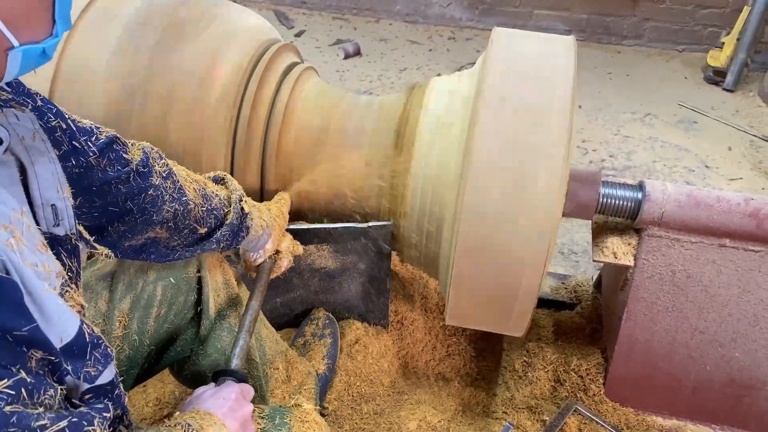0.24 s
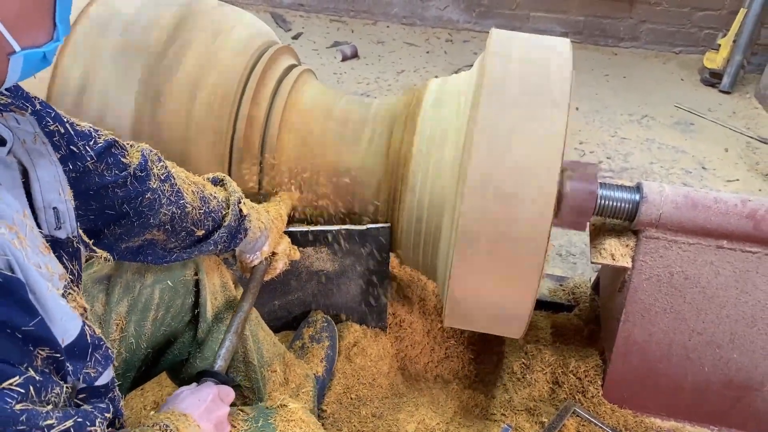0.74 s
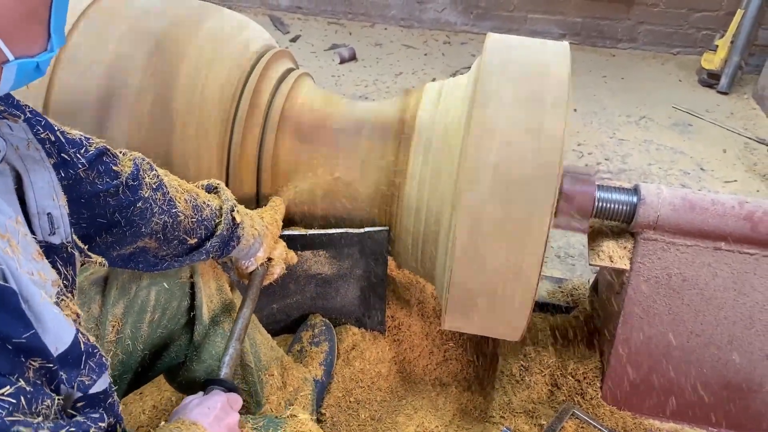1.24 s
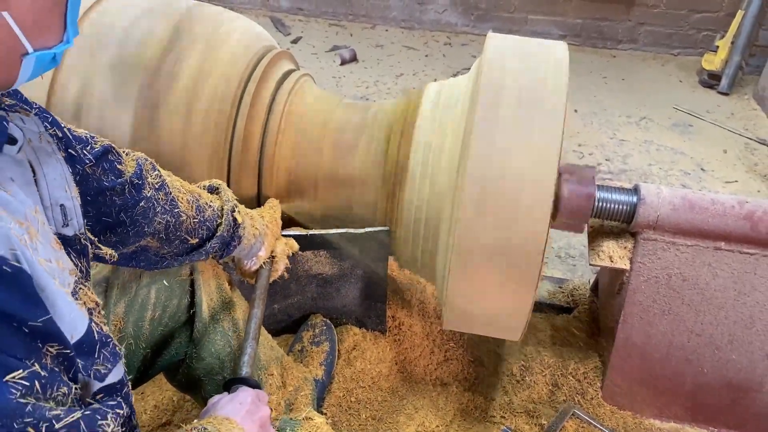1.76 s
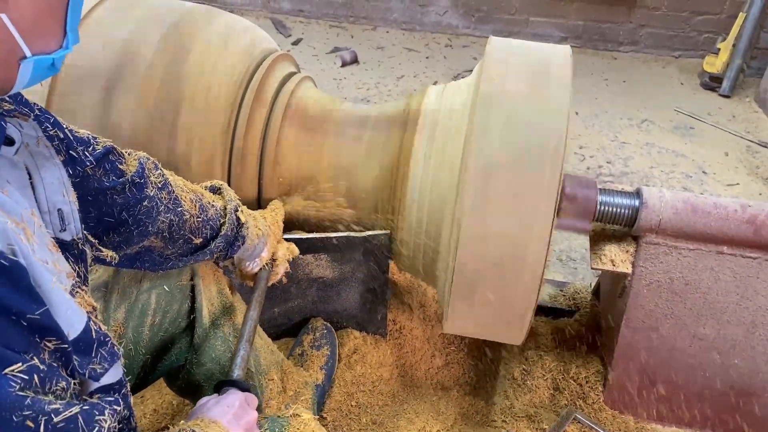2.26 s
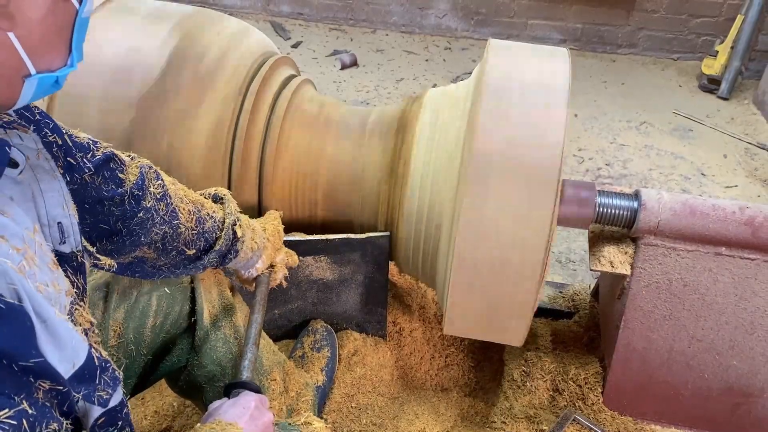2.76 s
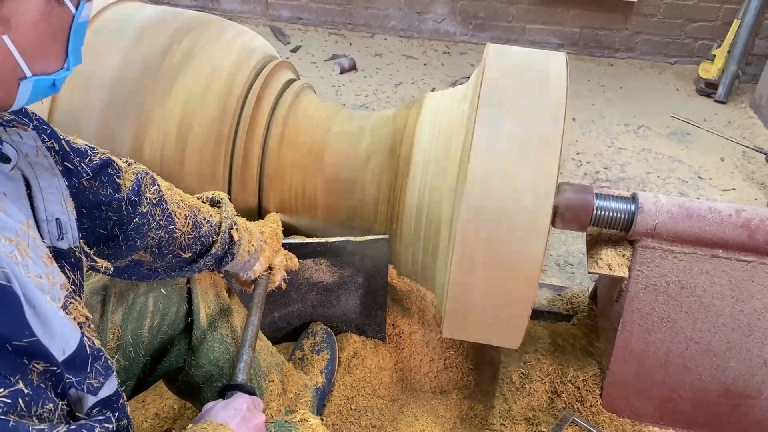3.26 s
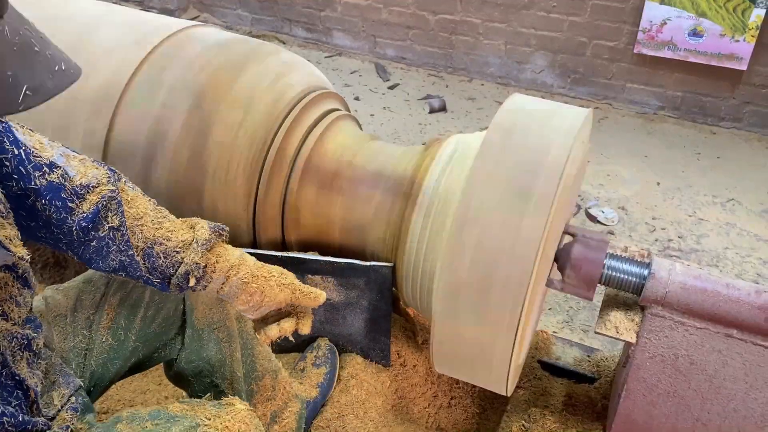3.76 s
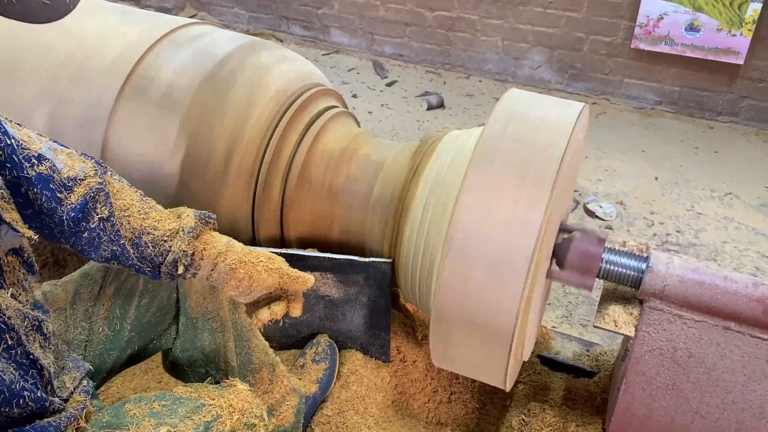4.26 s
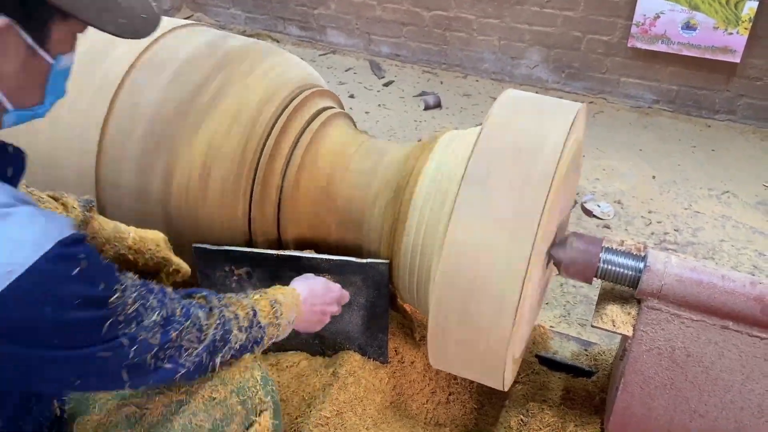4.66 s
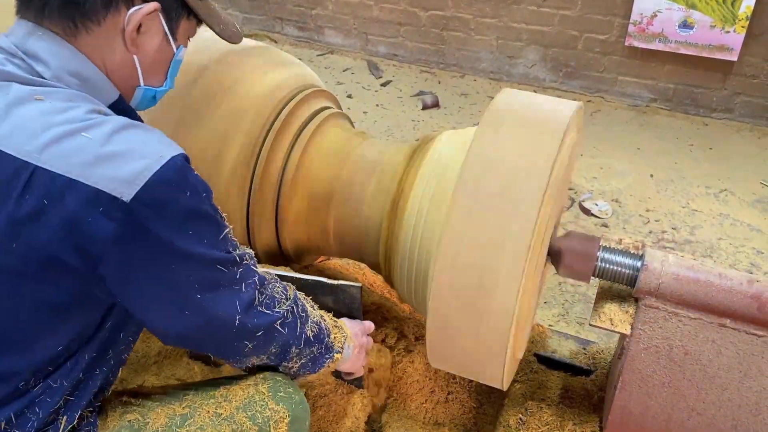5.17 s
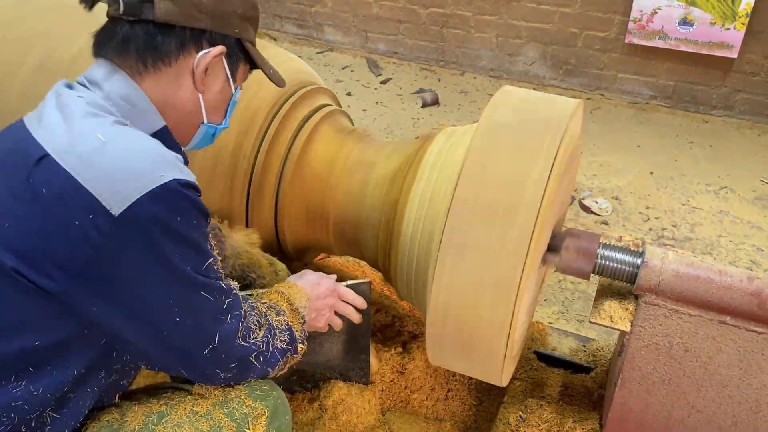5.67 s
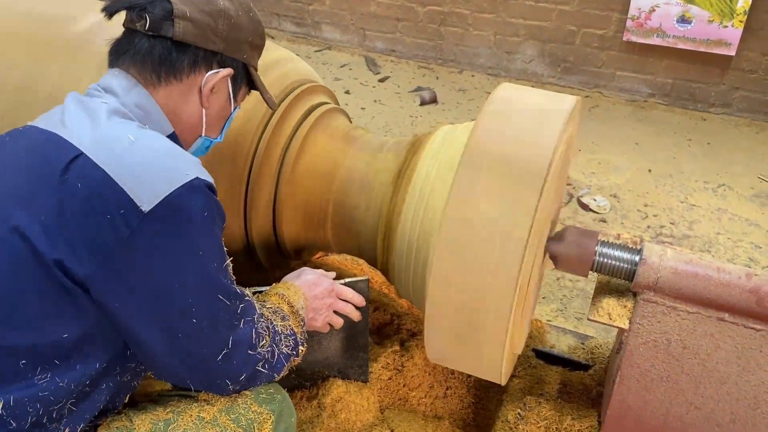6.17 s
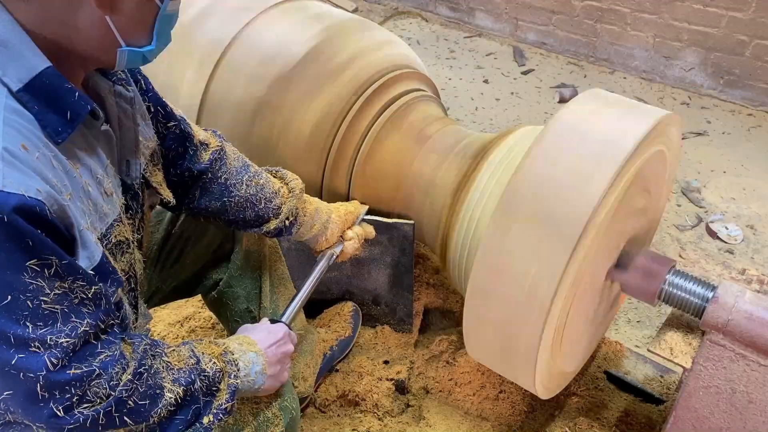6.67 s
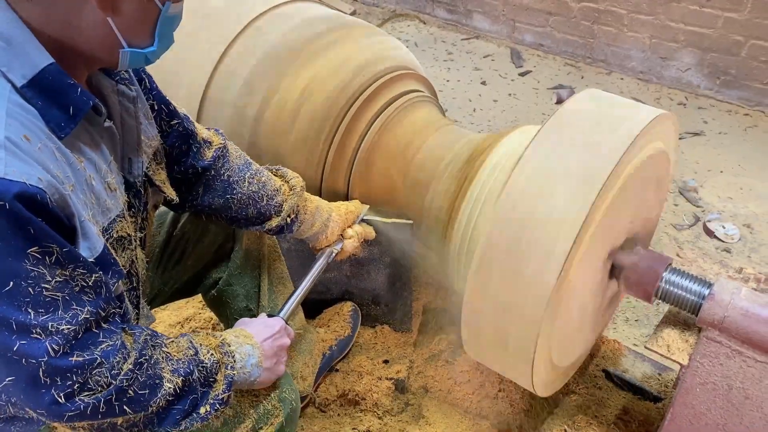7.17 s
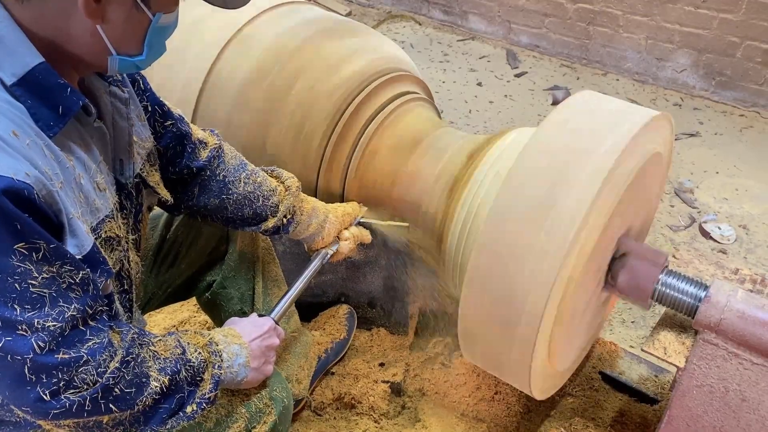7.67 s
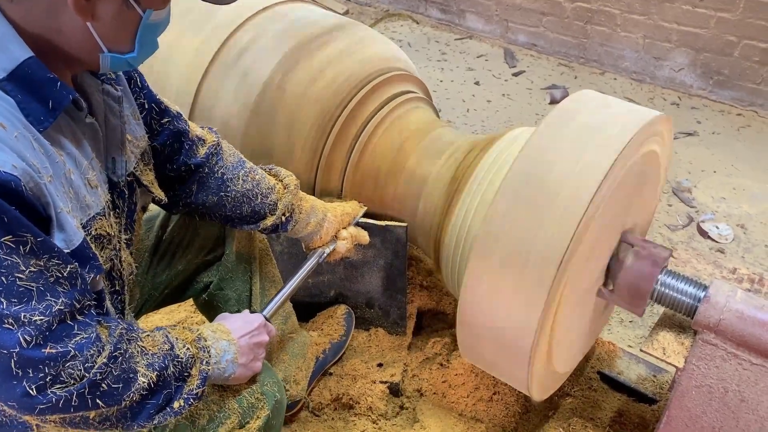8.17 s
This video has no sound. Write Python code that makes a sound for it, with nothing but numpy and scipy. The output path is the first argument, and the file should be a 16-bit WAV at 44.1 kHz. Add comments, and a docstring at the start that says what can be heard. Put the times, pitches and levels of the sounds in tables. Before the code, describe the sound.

In a workshop, a chisel bites a big turning log in several short, gritty hissing cuts, some with a narrow whine around the upper midrange. The cutting stops, a soft wooden knock follows, and the lathe's rapid rattle with small metallic ticks runs alone over low rumble. Then a long, squealing cut resumes. Close stereo microphone, dry; its position changes twice after tiny dropouts.

```python
"""A chisel cuts a large turning log on a lathe in a brick workshop, lifting off now and then. Snapping fibres
are shaped noise, which hisses and rings the chisel and the log through resonators. The drive rattles twice a
turn: rasping noise and loose parts throb with each stroke. Single rings and one wooden knock are decaying
sines; motor, frame and stand rumble as low noise. Twice the sound drops out for a moment; after each, the
balance, the rattle and the drive's timing differ."""
import sys
import numpy as np
from scipy import signal
from scipy.fft import rfft, irfft, next_fast_len
from scipy.io import wavfile
from scipy.ndimage import uniform_filter1d

SR = 44100
rng = np.random.default_rng(int(sys.argv[2]) if len(sys.argv) > 2 else 0)


def put_to_file(sound):
    """Save the sound as 16-bit audio at rate SR, in the file named by the first command-line argument."""
    columns = np.atleast_2d(sound).T  # one column per channel
    safe = np.clip(columns, -1, 1)
    whole_steps = np.round(safe * 32767)
    wavfile.write(sys.argv[1], SR, whole_steps.astype(np.int16))


N = 371322
T = np.arange(N) / SR
HOP = 64  # samples between control points


def gain_of(db):
    """Level: an amplitude ratio is ten to the power of dB / 20."""
    return 10 ** (np.asarray(db) / 20)


def evened(x):
    """Power normalization: scales x to rms 1."""
    return x / np.sqrt(np.mean(x ** 2) + 1e-20)


def read(points, hz):
    """Spectral envelope: interpolates a table linearly in dB (or share) over log frequency."""
    f, value = np.transpose(points)
    return np.interp(np.log(hz + 1), np.log(f + 1), value)


def colour(x, spectrum):
    """Linear filtering: weights the spectrum of x by an envelope, then scales to rms 1."""
    size = next_fast_len(N)
    weights = gain_of(read(spectrum, np.fft.rfftfreq(size, 1 / SR)))
    return evened(irfft(rfft(x, size) * weights, size)[..., :N])


def resonate(x, hz, *widths_hz):
    """Resonance by heterodyning: shifts the curve hz to zero, smooths once a width, shifts back."""
    turns = np.cumsum(hz * np.ones(x.shape[-1])) / SR % 1
    angle = (2 * np.pi * turns).astype(np.float32)
    carrier = np.cos(angle) + 1j * np.sin(angle)
    slow = x.astype(np.float32) * carrier.conj()
    for r in np.exp(-np.pi * np.array(widths_hz) / SR):
        slow = signal.lfilter(np.complex64([1 - r]), np.complex64([1, -r]), slow)
    return evened((carrier * slow).real)


def drift(rate_hz):
    """Random modulation: noise through a one-pole lowpass at rate_hz, rms 1."""
    count = round(N / SR * 400)  # 400 knots a second
    knots = np.arange(-2, count - 2) / 400
    pole = np.exp(-2 * np.pi * rate_hz / 400)
    smooth = signal.lfilter([1], [1, -pole], rng.standard_normal(count))
    return evened(np.interp(T, knots, smooth))


# Stretches of sound between the dropouts. Columns: from t/s, lag behind a steady beat/strokes, left minus
# right/dB, # rattle level/dB, swell/(dB/s), nominal treble level/dB, share of the log's thump/1
STRETCHES = [(0, -0.35, -0.3, -40, 0.55, -5, 1), (3.537, 0.49, 1.1, -37, 1.5, -2.5, 1),
             (6.66, .32, -.7, -34, -2.5, 0, 0.23)]


def stretch(s):
    """Piecewise-constant conditions: the stretch between dropouts that holds at time s."""
    return np.maximum(np.searchsorted(np.transpose(STRETCHES)[0], s, "right") - 1, 0)


# Cuts, one a row. Columns: touch t/s, time to sink in/s, lift t/s, depth level/dB, chatter f/Hz,
# chatter spread/1, then nominal levels above the depth: chatter/dB, fizz/dB, sizzle/dB, log body/dB
CUTS = [(-.2, .1, 0.07, -29.5, 1650, .5, -12, -13, -19, -6.5),
        (0.186, 0.013, 0.32, -36, 1650, 1, -10, -10, -20, -6.5),
        (.33, .12, 0.77, -24, 1610, .6, -12, -9.5, -15.5, -6.5),
        (.955, .07, 1.263, -31, 1683, 0.3, -6, -11.5, -15.5, -8),
        (1.62, .3, 2.46, -28.5, 1712, 0.1, -3, -9, -24, -9),
        (3.02, 0.03, 3.07, -33.5, 1790, .45, -1, -10, -30, -10.5),
        (3.2, 0.2, 3.53, -32.5, 1713, .1, -3.5, -6.5, -30, -14),
        (6.75, 0.052, 8.5, -28.5, 1735, 0.1, -5, -13, -30, -4.5)]
# The edge digs deeper for a moment. Columns: t/s, level above the depth/dB
SURGES = [(0, 5), (1.04, 2), (1.95, 3), (2.24, 2), (3.25, 3), (6.95, 2.5), (7.135, 6), (7.63, 3),
          (7.96, 2.5), (8.24, 4.5)]
SURGE_RISE_S, SURGE_FALL_S = 0.035, 0.045
ENTRY_DB, TOUCH_DB_PER_S, LIFT_DB_PER_S = -10, 450, 278  # light entry; meeting and leaving the wood


def depth():
    """Forcing level: each cut enters light, sinks in, holds with surges and lifts off.

    Gives the cut under way, its depth level, the part still to sink (negative) and the part lifted, in dB."""
    touch, sink, lift, db = np.transpose(CUTS)[:4, :, None]
    t = T[::HOP]
    light_db = ENTRY_DB * np.clip(1 - (t - touch) / sink, 0, 1)
    lifted_db = LIFT_DB_PER_S * np.maximum(t - lift, 0)
    db = db + light_db - lifted_db - TOUCH_DB_PER_S * np.maximum(touch - t, 0)
    db = np.where(stretch(t) == stretch(touch), db, -200)  # a cut is heard only within its own stretch
    surge = sum(d * np.exp(-((t - s) / np.where(t < s, SURGE_RISE_S, SURGE_FALL_S)) ** 2)
                for s, d in SURGES)
    cut = db.argmax(axis=0)  # the deepest cut is the one under way
    curves = (db + surge, light_db, np.minimum(lifted_db, 20))
    smooth = (np.interp(T, t, np.choose(cut, curve)) for curve in curves)
    return (np.repeat(cut, HOP)[:N], *smooth)


def snapping_fibres():
    """Shot noise: random snaps join a noise floor whose level drifts with the grain hardness."""
    sizes = gain_of(2.7 * np.minimum(rng.exponential(1, (2, N)), 5)) * rng.choice([-1, 1], (2, N))
    snaps = sizes * (rng.random(N) < 1500 / SR)  # about 1500 a second
    return (rng.standard_normal((2, N)) + .5 * evened(snaps)) * gain_of(1.27 * drift(25))


# Fibres tearing. Columns: f/Hz, relative level per Hz in the short cuts/dB, the same in the last cut/dB
SCRAPE = [(820, -55, -55), (1400, -13.5, -11), (1670, -1.5, -3), (2100, -4, -3), (2290, -8.5, -3),
          (2650, -4, -10), (3000, -4, -10), (3500, -6, -1.5), (3900, -4, -6), (4150, -15, -13),
          (4700, -13, -11), (10000, -29, -29), (19800, -120, -120)]
# Fine dust leaving the edge. Columns: f/Hz, relative level per Hz/dB
FIZZ = [(3530, -24), (6000, -1.5), (9310, -4), (13900, -7), (16000, -15)]


def hiss(tear, in_last, fizz_db, sizzle_db):
    """Broadband radiation: tearing fibres and fine dust, with one band that stands out."""
    short, last = (colour(tear, np.array(SCRAPE)[:, [0, k]]) for k in (1, 2))
    scrape = gain_of(-3) * np.where(in_last, last, short)
    fizz = gain_of(fizz_db + 1.2) * colour(tear, FIZZ)
    return scrape + fizz + gain_of(sizzle_db) * resonate(tear, 7900, 1500, 1500)


# The log sounding under the cut. Columns: f/Hz, relative level per Hz/dB
BODY = [(180, -8), (300, -12.5), (446, -5), (775, -12.5), (1120, -1), (1500, -6.5), (3300, -120)]
THUMP_HZ = 1078  # the log thumps below this pitch


def log_body(tear, body_db):
    """Forced vibration: the cut drives the log, whose low thump is stronger in some stretches than in others."""
    body = colour(tear, BODY)
    ring = signal.sosfilt(signal.butter(3, THUMP_HZ, "high", fs=SR, output="sos"), body)
    thump_share = np.transpose(STRETCHES)[6][stretch(T)]
    return gain_of(body_db + 3.55 * drift(25)) * (ring + thump_share * (body - ring))


# Chisel resonances. Columns: f/Hz, width/Hz, mean level above the depth/dB
CHISEL = [(1237, 190, -18.5), (2030, 110, -17), (2655, 60, -19), (3215, 80, -23)]


def chisel_ring(tear):
    """Modal resonance: the noise of the cut excites the fixed modes of the chisel."""
    return sum(gain_of(db + 3.6 * drift(39)) * resonate(tear, f, w) for f, w, db in CHISEL)


# First smoothing widths of the chatter: tight/Hz, spread/Hz
CHATTER_WIDTH_HZ = (36, 320)


def chatter(tear, hz, spread, chatter_db):
    """Narrow-band vibration: a wobbling resonance, blended from tight to spread."""
    wobble = 1 + 0.013 * drift(8.5)  # the pitch is never quite still
    second_width = 3.0 * CHATTER_WIDTH_HZ[1]
    tight, loose = (resonate(tear, hz * wobble, w, second_width) for w in CHATTER_WIDTH_HZ)
    blend = tight + np.clip(spread, 0, 1) * (loose - tight)
    return gain_of(chatter_db + 2.15 * drift(30)) * blend


# Whine resonances. Columns: f/Hz, width of the first of two stages/Hz
WHINE = [(5360, 190), (5640, 220)]
WHINE_RISE_S, WHINE_RISE_HZ_PER_S = 8.26, 900  # the whine climbs at the end


def whine(tear, whine_db):
    """Cascaded resonance: two smoothing stages keep the whine narrow."""
    climb = WHINE_RISE_HZ_PER_S * np.maximum(T - WHINE_RISE_S, 0)
    return sum(gain_of(whine_db - 1.2 + 3.0 * drift(12)) * resonate(tear, f + climb, w, 3.0 * w)
               for f, w in WHINE)


# The edge catches. Columns: t/s, nominal level/dB
CATCHES = [(1.7626, -20.5), (1.9443, -13), (2.2229, -14), (2.2553, -19), (3.3376, -24), (3.4327, -17.5),
           (7.1624, -20), (7.4408, -15), (7.63, -17), (7.7088, -17)]


def catches(chatter_hz):
    """Impulse response: a short crack, then a decaying ring of the chisel at the chatter pitch."""
    out, t = np.zeros((2, N + 2000)), np.arange(2000) / SR
    for s, db in CATCHES:
        at = round(s * SR)
        crack = rng.standard_normal((2, len(t))) * np.exp(-t / 0.0041) * 0.35
        turns = chatter_hz[at] * t + rng.random((2, 1))
        ring = np.sin(2 * np.pi * turns) * np.exp(-t / 0.012) * 0.71
        out[:, at:at + len(t)] += gain_of(db) * (crack + ring)
    return out[:, :N]


# The edge slides along the rest in the last cut. Columns: t/s, chatter above its final pitch f/Hz,
# nominal whine level above the depth/dB, squeal level above the depth/dB, change of log body level/dB
SLIDE = [(6.75, 600, -15, -30, -30), (7.14, 229, -12.5, -3, -33), (7.5, 100, -7, -7.5, -16),
         (7.62, 64, -3, -10, -5), (7.78, 50, -4, -21, -3), (8.42, 2, -3.5, -40, 2.5)]
WHINE_DB = -19.5  # nominal, above the depth, in the short cuts
SQUEAL_RATIO, SPREAD_PER_HZ, FIZZ_DB_PER_HZ = 3.65, .0024, 0.0068  # these follow the chatter pitch
CHATTER_LAG, LIFT_HISS = .7, 0.25  # dB per dB: chatter builds on entry; a leaving edge hisses more


def cutting(cut, depth_db, light_db, lifted_db):
    """Source and resonator: snapping fibres hiss and ring the chisel and the log."""
    hz, spread, chatter_db, fizz_db, sizzle_db, body_db = np.transpose(CUTS)[4:, cut]
    in_last = cut == len(CUTS) - 1
    s, *columns = np.transpose(SLIDE)
    in_short_cuts = (0, WHINE_DB, -np.inf, 0)  # no squeal there
    above_hz, whine_db, squeal_db, body_change_db = (
        np.where(in_last, np.interp(T, s, c), short) for c, short in zip(columns, in_short_cuts))
    hz = hz + above_hz
    spread = spread + SPREAD_PER_HZ * above_hz
    chatter_db = chatter_db + CHATTER_LAG * light_db
    fizz_db = fizz_db + FIZZ_DB_PER_HZ * above_hz + LIFT_HISS * lifted_db
    tear = snapping_fibres()
    out = hiss(tear, in_last, fizz_db, sizzle_db)
    out += log_body(tear, body_db + body_change_db)
    out += chisel_ring(tear)
    out += chatter(tear, hz, spread, chatter_db)
    out += gain_of(squeal_db) * resonate(tear, SQUEAL_RATIO * hz, 600)
    out += whine(tear, whine_db)
    return gain_of(depth_db) * out + catches(hz)


def stroke(beat, rise, length):
    """Periodic envelope: rise, hold and exponential fall within every stroke."""
    phase = (beat + .3) % 1
    return np.minimum(phase / rise, 1) ** 2 * np.exp(-np.maximum(phase - rise - length, 0) / 0.14)


# Broad part of a stroke. Columns: f/Hz, relative level per Hz/dB
RASP = [(450, -13), (700, -7), (1440, -12.5), (1890, -6.5), (2800, -17), (3410, -4.5), (4100, -17),
        (5120, -7.5), (9350, -13), (16000, -21)]
# How far the rasp follows the strokes. Columns: f/Hz, share of the throb/1
RASP_DEPTH = [(1000, 0.05), (3000, 0.45), (6000, 0.6), (10000, 0.75), (15000, 0.65)]


def rasp(beat, strokes, treble_db):
    """Amplitude modulation: noise throbs with the strokes, more or less by frequency."""
    frames, hz = np.arange(0, N + 512, HOP).clip(max=N - 1), np.fft.rfftfreq(256, 1 / SR)
    which = (beat[frames] + 0.44).astype(int)
    odd = which % 2  # odd strokes swell slowly to a sharper top
    throb_db = 20 * np.log10(stroke(beat[frames], 0.16 + 0.11 * odd, .3 - 0.15 * odd) + 0.095)
    throb_db += 2.0 * rng.standard_normal(strokes)[which] + 6.2 * odd
    a, b, patches = rng.standard_normal((len(frames), len(hz), 2, 3)).T
    # patches of time and frequency that are randomly louder or softer
    patches = evened(uniform_filter1d(uniform_filter1d(patches[0], 5, axis=0), 9, axis=1))
    level_db = read(RASP, hz)[:, None] + read(RASP_DEPTH, hz)[:, None] * throb_db + 2.9 * patches
    level_db += np.clip(hz / 6000 - .6, 0, 2)[:, None] * treble_db[frames]
    noise = signal.istft((a + 1j * b) * gain_of(level_db), nperseg=256, noverlap=256 - HOP)[1]
    return gain_of(0.5) * evened(noise[:, :N])


# Loose parts. Columns: f/Hz, width of the second of two stages/Hz,
# relative level on even strokes/dB, the same on odd strokes/dB, lag/strokes
PARTS = [(1900, 52, -18.5, -7.5, 0.2), (3275, 90, -2.5, -9.5, -0.068), (3650, 90, -14, -6, -.02),
         (5030, 440, -7.5, -9.5, 0.13), (5850, 90, -14.5, -7, 0.048), (9450, 500, -6.5, -8.5, 0.066),
         (11300, 250, -18, -13.5, -0.039), (2400, 100, -27, -11.5, .15)]
# The first part rings louder in spells. Columns: from t/s, to t/s, added level/dB
SPELLS = [(0, 3.5, 8), (4.35, 4.6, 10), (4.9, 5.2, 9), (5.57, 5.9, 10), (6.3, 6.7, 12)]
SETTLED_DB, SPELL_EDGE_S = -5, 0.049  # the first part outside its spells; fade at either end
SETTLE_SHARE, SETTLE_STROKES = 0.6, .12  # it starts each stroke sharp and sinks to its pitch


def loose_parts(beat, strokes, treble_db):
    """Impact excitation: random taps under each stroke's force ring the resonance of every part."""
    slack_db = SETTLED_DB + sum(d * np.clip(np.minimum(T - a, b - T) / SPELL_EDGE_S + 1, 0, 1)
                                for a, b, d in SPELLS)
    shake = rng.standard_normal((2, N))
    out = np.zeros((2, N))
    for number, (f, width, even_db, odd_db, lag) in enumerate(PARTS):
        which = (beat - lag + 0.26).astype(int)
        level_luck, pitch_luck = rng.standard_normal((strokes, 2)).T
        stroke_db = np.where(np.arange(strokes) % 2, odd_db, even_db) + 2.1 * level_luck
        force = gain_of(stroke_db)[which] * (stroke(beat - lag, 0.11, 0.21) + 0.025)
        if number == 0:
            force = force * gain_of(slack_db)
            sharp = SETTLE_SHARE * np.exp(-((beat - lag + .3) % 1) / SETTLE_STROKES)
        else:
            force = force * gain_of(max(f / 6000 - 1.6, 0) * 2 * treble_db)
            sharp = 0
        taps = shake * (0.12 + (rng.random(N) < 1300 / SR))  # sparse knocks over a weak floor
        pitch = f * (1 + 0.022 * pitch_luck[which] + sharp)
        level = np.sqrt(np.mean(force ** 2)) * 1.47
        out += level * resonate(taps * force, pitch, 5.2 * width, width)
    return out


STROKES_PER_S = 21.75  # before the drag of the cut
ODD_EARLY = .09  # odd strokes come this many strokes early
LOAD_STROKES_PER_S, TREBLE_PER_DB = .24, 0.66  # cutting slows the drive; treble swells with the rattle


def rattle(depth_db):
    """Periodic excitation: each stroke rasps and knocks loose parts; even and odd strokes differ."""
    start, behind, _, db, swell, treble_db = np.transpose(STRETCHES)[:6, stretch(T)]
    cut_s = np.cumsum(np.clip((depth_db + 45) / 15, 0, 1)) / SR  # time spent cutting, by depth
    behind = behind + LOAD_STROKES_PER_S * (cut_s - np.interp(start, T, cut_s))
    swell_db = swell * (T - start)
    treble_db = treble_db + TREBLE_PER_DB * swell_db
    beat = STROKES_PER_S * T - behind + 2
    beat = beat + ODD_EARLY * np.sin(np.pi * beat / 2) ** 2 - .04
    strokes = int(beat.max()) + 2
    out = rasp(beat, strokes, treble_db) + loose_parts(beat, strokes, treble_db)
    return gain_of(db + swell_db) * evened(out)


# Single rings of the loose parts. Columns: t/s, nominal peak level/dB, f/Hz
PINGS = [(1.4571, -27, 3330), (1.5489, -26, 3330), (2.663, -24.5, 3330), (2.8504, -27, 3400),
         (4.839, -24, 3450), (4.955, -23, 1930), (5.0739, -22, 3330), (5.224, -22, 2420),
         (5.686, -20, 3650), (5.716, -20, 3600), (5.862, -22, 5820), (5.868, -20, 1920),
         (5.903, -19.5, 3330), (6.3584, -22, 3330)]


def pings():
    """Free vibration: single short rings are sines with a quick onset and exponential decay."""
    out, t = np.zeros((2, N)), np.arange(2000) / SR
    shape = np.minimum(t / .002, 1) * np.exp(-t / .006)
    for s, db, hz in PINGS:
        turns = hz * t + rng.random((2, 1))
        out[:, round(s * SR):][:, :len(t)] += gain_of(db) * shape * np.sin(2 * np.pi * turns)
    return out


# Wood bumped. Columns: t/s, nominal level/dB
KNOCK = [(3.724, -12.5)]
# Modes of the bumped wood. Columns: f/Hz, relative level/dB, time to decay by 60 dB t/s
KNOCK_MODES = [(252, -2, 0.076), (353, -1.5, 0.061), (530, -7.5, 0.045), (770, -14, 0.042)]


def knock():
    """Modal superposition: a soft blow rings the low modes of the wood, each with its own decay."""
    out, t = np.zeros(N), np.arange(6000) / SR
    ring = sum(gain_of(d - 60 * t / t60) * np.sin(2 * np.pi * f * t) for f, d, t60 in KNOCK_MODES)
    for s, db in KNOCK:
        out[round(s * SR):][:len(t)] += gain_of(db) * ring * np.minimum(t / 0.0085, 1)
    return out


# Motor and frame. Columns: f/Hz, relative level per Hz/dB
RUMBLE = [(94, -58), (160, -5), (286, 1.5), (492, -15), (583, -12.5), (736, -21.5), (871, -33), (1500, -31),
          (3300, -120)]
# Floor and stand. Columns: f/Hz, relative level per Hz/dB
THUD = [(20, -14.5), (60, -6.5), (120, -2.5), (170, -7), (300, -66)]
# Course of the rumble. Columns: t/s, mean level of the frame's hum/dB, mean level of the deep thud/dB
RUMBLE_DB = [(.15, -48, -51), (.55, -47, -43), (1.6, -44, -52), (2.15, -44, -36), (2.6, -45, -51),
             (5.2, -41.5, -38.5), (5.7, -41, -43), (6.3, -40.5, -37), (6.9, -36, -43.5),
             (7.5, -41.5, -44.5), (8.42, -39, -45)]


def rumble():
    """Structure-borne noise: low bands of motor, frame, floor and stand with drifting levels."""
    s, hum_db, thud_db = np.transpose(RUMBLE_DB)
    hum_gain = gain_of(np.interp(T, s, hum_db) + 2.05 * drift(15))
    thud_gain = gain_of(np.interp(T, s, thud_db) + 2 * drift(9.4))
    hum = hum_gain * colour(rng.standard_normal((2, N)), RUMBLE)
    return hum + thud_gain * colour(rng.standard_normal((2, N)), THUD)


def scene():
    """Superposition: all sources add; noise is drawn apart for left and right, the knock is shared."""
    side = np.transpose(STRETCHES)[2][stretch(T)] / 2
    cut, depth_db, light_db, lifted_db = depth()
    sources = cutting(cut, depth_db, light_db, lifted_db) + rattle(depth_db)
    sources = sources + pings() + knock() + rumble()
    return sources * gain_of([side, -side])


# Dropouts. Columns: fade out t/s, fade in t/s
DROPOUTS = [(3.525, 3.549), (6.649, 6.671)]
EDGE_HZ = 15900  # upper band limit


def record(dry):
    """Gating and band limitation: two short dropouts with quick fades, then a lowpass filter."""
    for start, end in DROPOUTS:
        dry = dry * np.clip(np.maximum(start - T, T - end) / 0.0017 + 1, .025, 1)
    lowpass = signal.firwin(511, EDGE_HZ, window=("kaiser", 9), fs=SR)
    return signal.oaconvolve(dry, lowpass[None], "same")


dry = scene()
out = record(dry)
put_to_file(out)
```